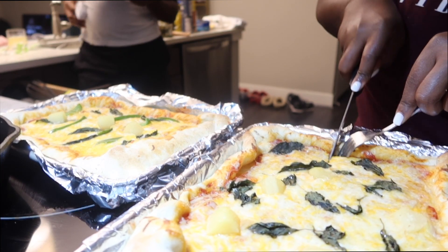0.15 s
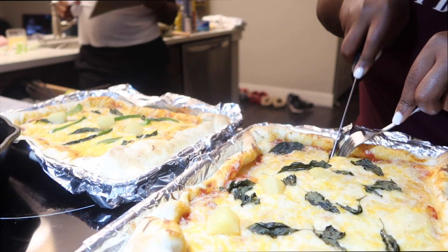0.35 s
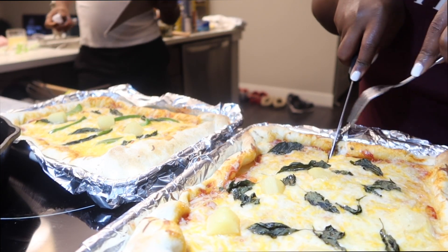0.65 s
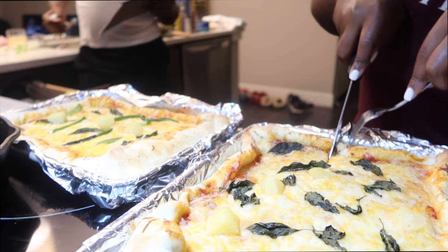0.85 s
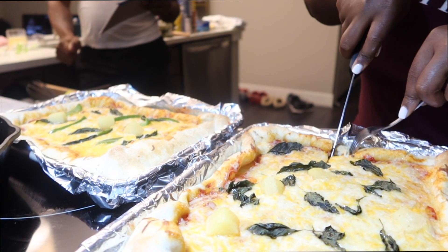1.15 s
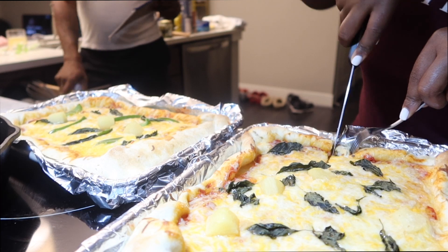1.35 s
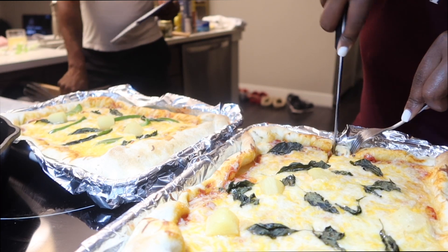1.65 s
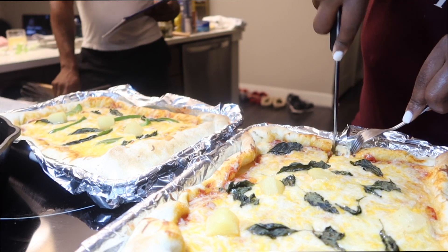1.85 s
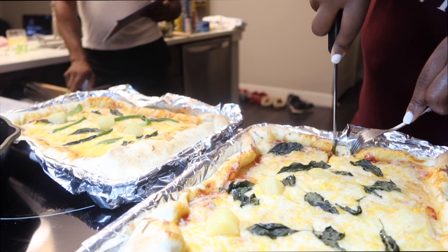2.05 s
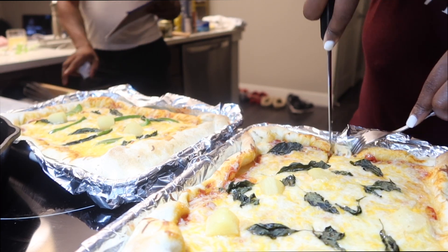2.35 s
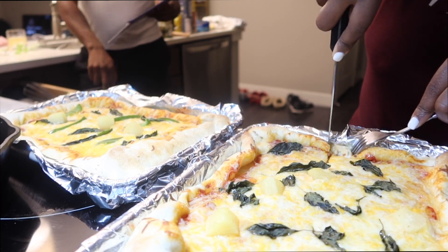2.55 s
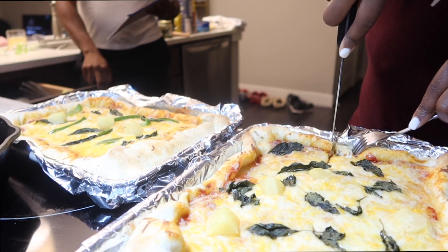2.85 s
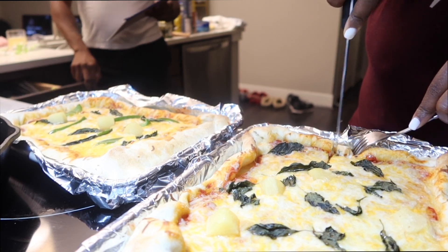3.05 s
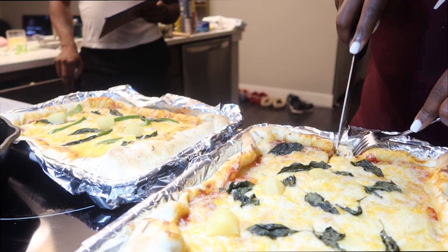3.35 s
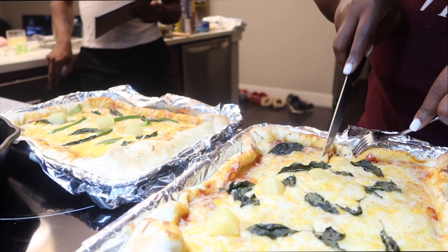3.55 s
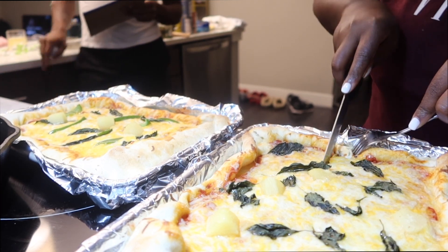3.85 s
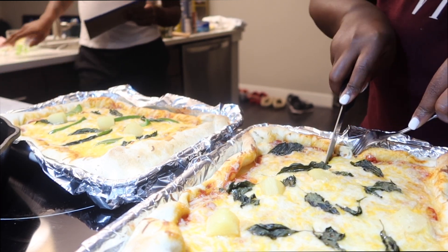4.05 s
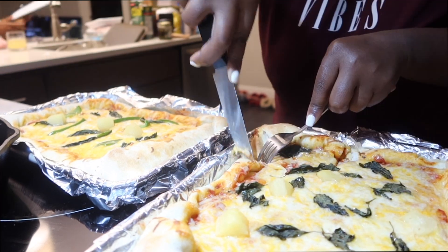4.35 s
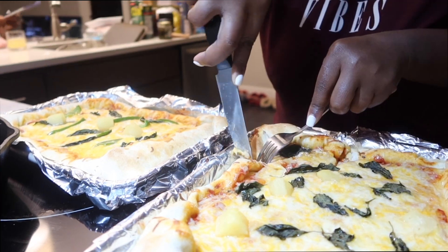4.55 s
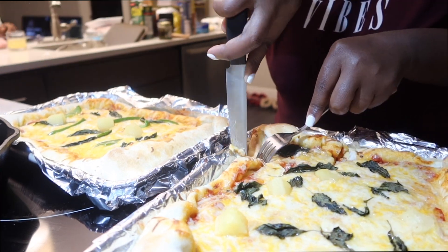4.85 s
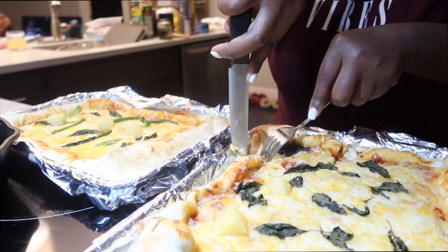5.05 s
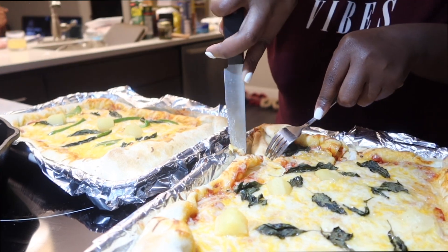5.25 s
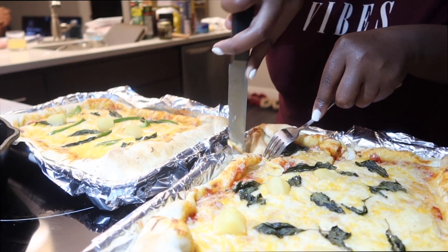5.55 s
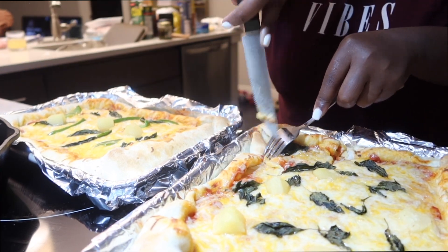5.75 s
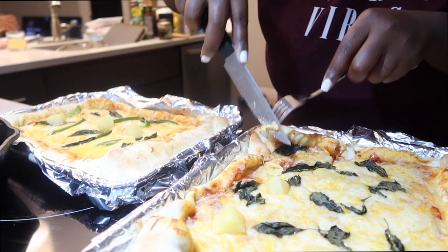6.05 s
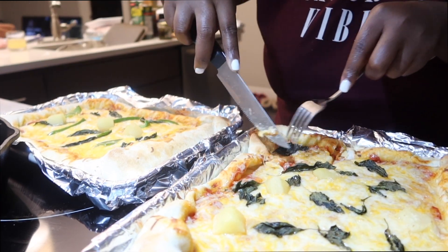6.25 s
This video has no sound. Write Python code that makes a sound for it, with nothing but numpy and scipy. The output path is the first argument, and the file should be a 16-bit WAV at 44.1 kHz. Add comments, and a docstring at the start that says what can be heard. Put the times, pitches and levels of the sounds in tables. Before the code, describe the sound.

Aluminium foil crackles and pops close to the microphones as food is sawn and pried, with small steel ticks and woody knocks through the pan onto the counter. The scraping becomes fast and rhythmic, peaks in loud blows, then thins out. A heavy low slide swells and ends in a booming double bump that rattles the pan. Short foil scrapes and one hard knock follow. Soft room reflections, low room tone and hum lie behind.

```python
"""Foil pan on a kitchen counter

Close to a stereo pair of microphones, a knife saws and a fork pries at food in a crinkled foil pan.
The foil rustles as crowds of tiny ringing buckles, and its creases snap as short tones with a noisy splash.
The blade knocks through onto the counter and rings its modes; something heavy slides, rumbling, and bumps shut.
Steel ticks are bright noise bursts, whistles are resonant noise. Behind it all lie the kitchen's diffuse
reflections and room tone with a refrigerator's hum; left and right differ mostly in the treble."""
import sys
import numpy as np
from scipy import signal
from scipy.fft import rfft, irfft, next_fast_len
from scipy.io import wavfile

SR = 44100
rng = np.random.default_rng(int(sys.argv[2]) if len(sys.argv) > 2 else 0)


def wrap_up_sound(samples):
    """Save the sound to the file named by the first command line argument, as 16-bit audio."""
    columns = np.atleast_2d(samples).T
    # keep every value between -1 and 1, then stretch to whole-number steps
    tamed = np.clip(columns, -1, 1)
    steps = np.round(tamed * 32767).astype(np.int16)
    wavfile.write(sys.argv[1], SR, steps)


def ratio(d):
    """dB to gain"""
    e = np.asarray(d, float) / 20
    return 10 ** e


N = 282681

# The pan settling and shifting between strokes. Each row: time in seconds, force on the foil in dB.
PAN_CREEP = [(0, -38.5), (.2, -27), (1.1, -36), (1.19, -44), (1.3, -37.5), (2.3, -46), (3.1, -52),
             (3.27, -49), (3.6, -45), (4.0, -48), (4.9, -51.5), (5.3, -57), (6.4, -69)]
# Foil scraped or bent. Each row: start in seconds, length in seconds, force in dB, brightness in dB.
FOIL_STROKES = [(0.289, 0.035, -29, -33), (0.403, 0.065, -34, -10), (0.574, 0.047, -40, -1),
                (0.912, 0.036, -40.5, 7.5), (1.119, 0.026, -37.5, -8), (1.242, 0.03, -31.5, -16),
                (1.35, 0.052, -30.5, -12), (1.477, 0.044, -32.5, -11.5), (1.582, 0.032, -28, -5),
                (1.687, 0.02, -31, -15), (1.71, 0.035, -28, -3.5), (1.783, 0.039, -32.5, -8.5),
                (1.847, 0.031, -33.5, -43), (1.888, 0.083, -30.5, -3.5), (1.932, 0.019, -23, -20),
                (2.017, 0.022, -28, -12), (2.036, 0.017, -21.5, -10.5), (2.145, 0.016, -33.5, -10),
                (2.556, 0.056, -37, -7), (2.625, 0.031, -38.5, -8.5), (2.683, 0.028, -37, -11),
                (2.907, 0.059, -39, -4.5), (3.18, 0.13, -43.5, -29), (4.177, 0.13, -36, -5),
                (4.221, 0.1274, -31, 0), (4.571, 0.054, -44, -21), (4.768, 0.035, -42.5, -31),
                (4.846, 0.032, -38.5, -17), (4.924, 0.075, -40.5, -22), (5.115, 0.026, -46, -11),
                (5.57, 0.059, -38.5, -8), (5.628, 0.071, -28, -7), (5.69, 0.022, -31, -4),
                (5.945, 0.032, -47.5, -12), (6.058, 0.02, -27, -0.5), (6.082, 0.082, -51.5, 6.5)]
# Creases popping. Each row: time in seconds, level in dB, pitch in Hz.
CREASE_SNAPS = [(0.155, -11, 2680), (0.2231, -7, 3050), (0.2791, -7.5, 2890), (0.294, -11.5, 1920),
                (0.4135, -4.5, 2070), (0.4308, -4.5, 1890), (0.489, -17, 2220), (0.5616, -13, 2480),
                (0.5796, -11.5, 2640), (0.7224, -12.5, 2500), (0.8016, -15, 3020), (0.8745, -20, 1300),
                (0.9065, 0, 1370), (0.98, -11.5, 3100), (1.255, -14, 2070), (1.354, -11.5, 1610),
                (1.724, -13, 1850), (1.746, -13, 1820), (1.796, -8.5, 1770), (1.8154, -10, 2140),
                (1.8963, -11, 1870), (1.919, -5, 1950), (1.942, 2, 2080), (2.17, -4, 2670),
                (2.3736, -14.5, 1900), (2.411, -16, 1970), (2.7037, -12.5, 2080), (4.849, -17.5, 2120),
                (5.1644, -24, 2830), (5.72, -14, 2600), (6.0625, -5.5, 2230)]
# Blade and pan landing on the counter. Each row: time in seconds, strength in dB, hardness in dB per octave.
COUNTER_KNOCKS = [(0.189, -15.5, -1.5), (.417, -12.5, 1), (0.199, -35, -18), (1.14, -21, -4),
                  (1.366, -15.5, -1), (1.593, -17.5, -7), (1.663, -17.5, 0.5), (1.814, -5, -2),
                  (2.043, -2, 2.5), (2.739, -17.5, 2.5), (4.438, -6, 4), (5.369, -24, -7.5),
                  (6.063, -26, -3), (6.081, -38, -14)]
# The heavy slide. Each row: time in seconds, rumble level in dB.
HEAVY_DRAG = [(2.6, -41), (2.7, -36.5), (3.15, -34.5), (3.45, -27.5), (3.74, -29), (3.8, -31.5),
              (3.98, -72)]
# Steel touching steel or foil. Each row: time in seconds, level in dB.
STEEL_TICKS = [(0.088, -26.5), (0.4663, -25.5), (0.67, -24), (.8185, -28), (1.0091, -26), (3.42, -32),
               (4.751, -42), (5.13, -28.5), (5.35, -43)]
# The slide whistling faintly. Each row: start in seconds, length in seconds, level in dB, pitch in Hz.
SLIDE_WHISTLES = [(3.254, 0.074, -41, 2350), (3.481, 0.078, -40, 1700)]
# Dull crumple of the foil. Each row: frequency in Hz, relative level in dB per Hz.
FOIL_BODY = [(600, -24), (1060, -2), (1390, -2), (1930, 3.5), (2950, -1.5), (4200, -11.5), (6500, -24.5)]
# Bright sizzle of the foil. Each row: frequency in Hz, relative level in dB per Hz.
FOIL_SIZZLE = [(2700, -0.5), (5000, -9), (8250, -12), (13000, -15), (15500, -42)]
# Modes of counter and pan. Each row: frequency in Hz, relative level in dB, decay by 60 dB in seconds.
COUNTER_MODES = [(66.7, -30, 0.93), (126.1, -13.5, 0.48), (181.8, -4.5, 0.23), (252.3, 2.5, 0.048),
                 (357, -4.5, 0.088), (444, 0, 0.055), (586, -6, 0.042), (794, -8.5, 0.035),
                 (1310, -12.5, 0.014), (2600, -16.5, 0.003)]
# Rumble of the slide. Each row: frequency in Hz, relative level in dB per Hz.
RUMBLE_COLOUR = [(40, -27), (70, -6.5), (180, 5.5), (264, -17), (340, -1), (651, -8), (1500, -18.5),
                 (3300, -64)]
# Room tone. Each row: frequency in Hz, relative level in dB per Hz.
ROOM_TONE = [(15, -32), (25, 4.5), (117, 3.5), (531, -9), (863, -18), (2220, -16.5), (12200, -37.5),
             (14800, -46), (16000, -63)]
# Refrigerator partials. Each row: frequency in Hz, typical peak level in dB.
FRIDGE_HUM = [(121, -49.5), (190, -50.5)]
# Stereo spread of the near sounds. Each row: frequency in Hz, side over mid in dB.
NEAR_WIDTH = [(60, -73), (330, -12.5), (1800, -43), (3200, -16), (4500, -1.5), (15000, 2.5)]
# Stereo spread of the room tone. Each row: frequency in Hz, side over mid in dB.
ROOM_TONE_WIDTH = [(60, -24), (330, -3), (800, 1.5), (2700, -9), (15000, -3)]

STROKE_ATTACK_S, STROKE_RELEASE_S = .003, .005
RAGGED_DB, PATCHY_DB = 2.3, 3.0   # spread of the uneven catch, and of the level of each patch or mode
TRAIL_DB, TRAIL_T60_S, TRAIL_LOSS_DB_PER_S = -3, 0.049, 99   # creep after a stroke, less after long ones
RATTLE_DB, RATTLE_RISE_S, RATTLE_T60_S = -17, 0.023, 0.29   # the bump shakes the pan
SNAP_RISE_S, SNAP_T60_S, SPLASH_DB, SPLASH_T60_S = 0.0005, .011, -13, 0.035
MODE_SHARE_DB, DETUNE = -5, .03   # a blow is shared among the modes; detuning is a fraction
CHATTER_DB, CHATTER_T60_S = -26, .12
BOOM_HZ, BOOM_T60_S, DRAG_BOOM_DB = 50, 0.36, -11.5   # deep mode; its level is under the rumble
BUMP_S, BUMP_DB, BUMP_RISE_S = 3.818, -1.5, 0.0083
BOUNCE_S, BOUNCE_LOSS_DB = .09, 5.5   # the bump bounces once
SHUDDER_DB, SHUDDER_T60_S = -10.5, 0.4
TICK_T60_S = .025
ROOM_T60_S, ROOM_DB, AIR_DB = .35, -18.0, -45.5
MIC_LOW_CUT_HZ, TOP_CUT_HZ = 46.6, 15500


def rms_one(x):
    """Scaled to unit rms."""
    return x / np.sqrt(np.mean(x ** 2) + 1e-20)


def in_time(rows):
    """A curve of (seconds, value) at every sample."""
    s, values = np.transpose(rows)
    return np.interp(np.arange(N) / SR, s, values)


def at_hz(points, hz):
    """A spectrum read on a log-frequency axis."""
    points_hz, db = np.transpose(points)
    return np.interp(np.log(hz + 1), np.log(points_hz), db)


def colour(x, points):
    """Filtered by a spectrum in dB."""
    size = next_fast_len(N + 8192)
    hz = np.arange(size // 2 + 1) * SR / size
    return irfft(rfft(x, size) * ratio(at_hz(points, hz)), size)[..., :N]


def drift(rate):
    """Slow chance: normal draws of spread 1, rate of them per second, joined by lines."""
    count = int(N / SR * rate) + 2
    return np.interp(np.arange(N) / SR * rate, np.arange(count), rng.standard_normal(count))


def ring(clicks, hz, t60):
    """A two-pole resonance: a unit click sets a decaying sine of starting height 1 ringing."""
    r, w = ratio(-60 / (t60 * SR)), 2 * np.pi * hz / SR
    return signal.lfilter([0, np.sin(w)], [1, -2 * r * np.cos(w), r * r], clicks + 1e-18)


def crackle(force, spectrum, per_s, spread_db, cycles, count):
    """Clumps of tiny buckles each ring one of many patches of foil, as hard as the force; patch levels drift."""
    sizes = ratio(spread_db * np.minimum(rng.exponential(1, N), 4)) * rng.choice([-1, 1], N)
    born = rng.random(N) < per_s * ratio(2.7 * drift(70.)) / SR
    patch_of = rng.integers(0, count, N)
    pitches = np.geomspace(spectrum[0][0], spectrum[-1][0], count)
    # two versions: under unit force, to set the level, and under the real force
    buckles = sizes * born * np.stack([np.ones(N), force])
    total = np.zeros((2, N))
    for k, hz in enumerate(pitches):
        clicks = buckles * (patch_of == k) * ratio(PATCHY_DB * drift(12.))
        total += ratio(at_hz(spectrum, hz)) * hz * ring(clicks, hz, cycles / hz)
    even, played = total
    return played / np.std(even)


def rustle():
    """Foil crumples dully near 2 kHz and sizzles above; strokes catch unevenly and leave a dull trail."""
    since = np.maximum(np.arange(N) / SR - BUMP_S, 0)
    creep = ratio(in_time(PAN_CREEP))
    rattle = (1 - np.exp(-since / RATTLE_RISE_S)) * ratio(RATTLE_DB - 60 * since / RATTLE_T60_S)
    dull = creep + rattle
    bright = creep * ratio(-13.5) + rattle * ratio(-25.0)
    ragged = ratio(RAGGED_DB * drift(90.))
    for start, length, force_db, bright_db in FOIL_STROKES:
        at, t = round(start * SR), np.arange(round(length * SR)) / SR
        end = at + len(t)
        # flicks fade, long rubs build up
        slope_db = np.clip(60. * length - 4.0, -6, 2.5)
        swell = ratio(slope_db * (t / length - 1.0) * 2)
        attack = np.minimum(1, t / STROKE_ATTACK_S)
        release = np.minimum(1, (length - t) / STROKE_RELEASE_S)
        shape = swell * attack * release * ragged[at:end]
        dull[at:end] += ratio(force_db) * shape
        bright[at:end] += ratio(force_db + bright_db) * shape
        after = np.arange(min(SR // 5, N - end)) / SR
        trail_db = force_db + TRAIL_DB - TRAIL_LOSS_DB_PER_S * length
        dull[end:end + len(after)] += ratio(trail_db - 60 * after / TRAIL_T60_S)
    body = crackle(dull, FOIL_BODY, per_s=4500., spread_db=3.3, cycles=32., count=24)
    sizzle = crackle(bright, FOIL_SIZZLE, per_s=6500., spread_db=3.6, cycles=40., count=14)
    return body + sizzle


def snaps():
    """A crease flips: its patch rings briefly while a splash of noise dies away through the sheet."""
    out, splash, t = np.zeros(N), np.zeros(N), np.arange(2205) / SR
    swell = 1 - np.exp(-t / SNAP_RISE_S)
    for s, level_db, hz in CREASE_SNAPS:
        at = round(s * SR)
        upper_hz = hz * (1.196 + 0.276 * abs(rng.standard_normal()))
        tone = np.sin(2 * np.pi * hz * t) + 0.32 * np.sin(2 * np.pi * upper_hz * t)
        out[at:at + len(t)] += ratio(level_db) * swell * tone * ratio(-60 * t / SNAP_T60_S)
        splash[at:at + len(t)] += ratio(level_db) * swell * ratio(-60 * t / SPLASH_T60_S)
    dull = rms_one(colour(rng.standard_normal(N), FOIL_BODY))
    bright = rms_one(colour(rng.standard_normal(N), FOIL_SIZZLE))
    return out + ratio(SPLASH_DB) * splash * (dull + ratio(-1.5) * bright)


def knocks():
    """Each landing strikes every counter mode; hard ones favour the upper modes, soft ones chatter more."""
    out, t = np.zeros(N + SR), np.arange(SR // 2) / SR
    chance = rng.standard_normal((len(COUNTER_KNOCKS), 2, len(COUNTER_MODES)))
    for (s, strength_db, hard_db), (stronger, sharper) in zip(COUNTER_KNOCKS, chance):
        at = round(s * SR)
        settle = ratio(CHATTER_DB - hard_db / 2 - 60 * t / CHATTER_T60_S)
        for k, (hz, level_db, t60) in enumerate(COUNTER_MODES):
            # one click, then the pan's chatter as it settles
            blow = settle * rng.standard_normal(len(t))
            blow[0] = (-1) ** k
            push = np.hanning(round(.7 * SR / hz))   # low modes build up later
            pushed = np.convolve(blow, push / push.sum())[:len(t)]
            tilt_db = hard_db * np.log2(hz / 250)
            gain = ratio(strength_db + level_db + MODE_SHARE_DB + tilt_db + 1.5 * stronger[k])
            # where it falls detunes the mode a little
            out[at:at + len(t)] += gain * ring(pushed, hz * (1 + DETUNE * sharper[k]), t60)
    return out[:N]


def slide():
    """Friction rumbles through the counter; a bump and its bounce shake it and a deep cabinet mode."""
    quiet = [(0, -90), (HEAVY_DRAG[0][0] - .1, -90)]
    drag, t = ratio(in_time(quiet + list(HEAVY_DRAG))), np.arange(N) / SR
    rough = rng.standard_normal(N) * ratio(2.5 * drift(30.))
    modes = np.zeros(N)
    for hz, db, t60 in COUNTER_MODES[1:8]:
        # friction damps the modes
        modes += ratio(PATCHY_DB * drift(6.3)) * rms_one(ring(rough, hz, 0.6 * t60)) * ratio(db)
    rumble = rms_one(colour(rough, RUMBLE_COLOUR)) + 0.55 * rms_one(modes)
    deep = rms_one(ring(rng.standard_normal(N), BOOM_HZ, BOOM_T60_S))
    shudder, boom = np.zeros(N), np.zeros(N)
    for k in range(2):
        since = np.maximum(t - BUMP_S - k * BOUNCE_S, 0)
        blow = ratio(BUMP_DB - k * BOUNCE_LOSS_DB) * (1 - np.exp(-since / BUMP_RISE_S))
        # the bounce damps the first blow's boom
        lifted = np.clip((BOUNCE_S - since) / BUMP_RISE_S, 0, 1) if k < 1 else 1
        boom += blow * lifted * ratio(-60 * since / BOOM_T60_S) * np.sin(2 * np.pi * BOOM_HZ * since)
        shudder += blow * ratio(SHUDDER_DB - 60 * since / SHUDDER_T60_S)
    return (drag + shudder) * rms_one(rumble) + drag * ratio(DRAG_BOOM_DB) * deep + boom


def ticks():
    """Steel touches steel or foil: a thin bright noise burst that dies at once."""
    marks, t = np.zeros(N), np.arange(1000) / SR
    for s, level_db in STEEL_TICKS:
        marks[round(s * SR)] = ratio(level_db)
    envelope = signal.fftconvolve(marks, ratio(-60 * t / TICK_T60_S))[:N]
    return envelope * rms_one(colour(rng.standard_normal(N), [(1200, -21)] + list(FOIL_SIZZLE)))


def whistles():
    """Rubbing noise in a narrow resonance, swelling and fading."""
    out = np.zeros(N)
    for start, length, level_db, hz in SLIDE_WHISTLES:
        at, swell = round(start * SR), np.hanning(round(length * SR))
        tone = rms_one(ring(rng.standard_normal(N), hz, 0.038))[:len(swell)]
        out[at:at + len(swell)] += ratio(level_db) * swell * tone
    return out


def kitchen(x):
    """Diffuse reflections: a decaying noise tail, duller than the source."""
    t = np.arange(SR // 2) / SR
    tail = rng.standard_normal(len(t)) * ratio(-60 * t / ROOM_T60_S) * (t > .004)
    tail = signal.lfilter([1], [1, -.5], tail)
    return ratio(ROOM_DB) * signal.fftconvolve(x, tail / np.sqrt(np.sum(tail ** 2)))[:N]


def air():
    """Room tone as coloured noise with a wavering refrigerator hum, as mid and side."""
    mid, side = colour(rng.standard_normal((2, N)), ROOM_TONE) * ratio(1.2 * drift(4.))
    scale, t = ratio(AIR_DB) / np.std(mid), np.arange(N) / SR
    hum = np.zeros(N)
    for hz, db in FRIDGE_HUM:
        level = ratio(db + 1.0 * drift(31.0))
        hum += level * np.sin(2 * np.pi * hz * t + 1.27 * drift(1.84))
    return scale * mid + hum, scale * colour(side, ROOM_TONE_WIDTH)


def scene():
    """Near sources in mid; their side is scattered by nearby surfaces, differently from spot to spot."""
    near = rustle() + snaps() + ticks() + knocks() + slide() + whistles()
    near = near + kitchen(near)
    scatter = rng.standard_normal((2, 330)) * ratio(-60 * np.arange(330) / SR / 0.016)
    scatter = scatter / np.linalg.norm(scatter, axis=1, keepdims=True)
    paths = signal.fftconvolve(near[None], scatter)[:, :N]
    spot = 3.37 * drift(40.)   # angle in radians that blends the two paths
    side = colour(np.cos(spot) * paths[0] + np.sin(spot) * paths[1], NEAR_WIDTH)
    air_mid, air_side = air()
    return near + air_mid + (side + air_side) * [[1], [-1]]


def roll_off(x):
    """The treble ends steeply here."""
    return signal.sosfilt(signal.butter(12, 16480, fs=SR, output="sos"), x)


def record(dry):
    """At the microphones peaks are rounded near full scale; the deepest bass and the very top are cut."""
    rounded = np.tanh(dry / 1.507) * 1.485
    low_cut = signal.butter(2, MIC_LOW_CUT_HZ, "high", fs=SR, output="sos")
    top_cut = signal.butter(10, TOP_CUT_HZ, fs=SR, output="sos")
    mix = signal.sosfilt(top_cut, signal.sosfilt(low_cut, rounded))
    return roll_off(mix)


dry = scene()
out = record(dry)
wrap_up_sound(out)
```